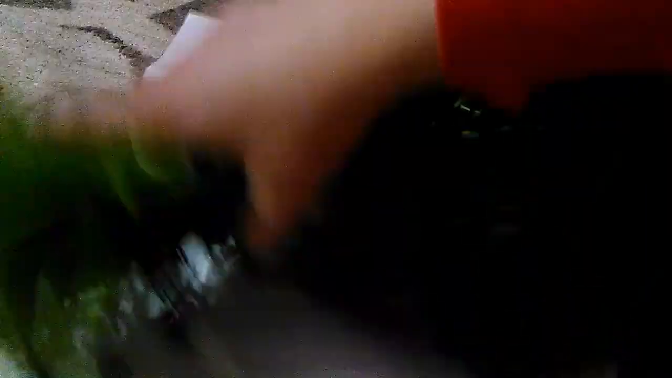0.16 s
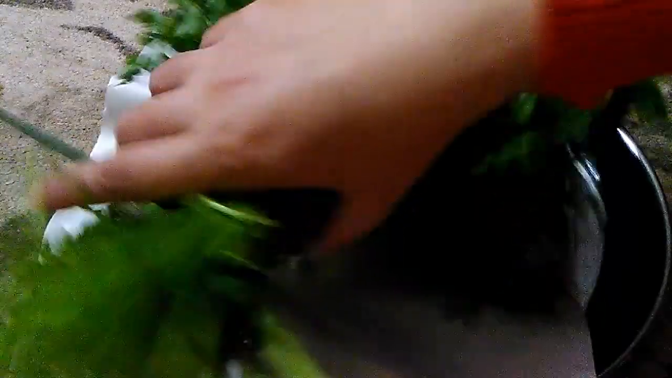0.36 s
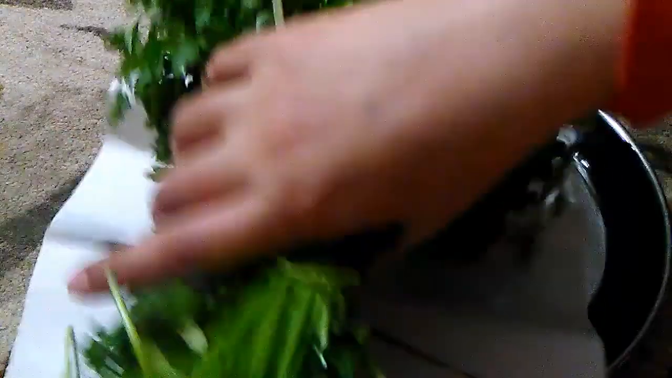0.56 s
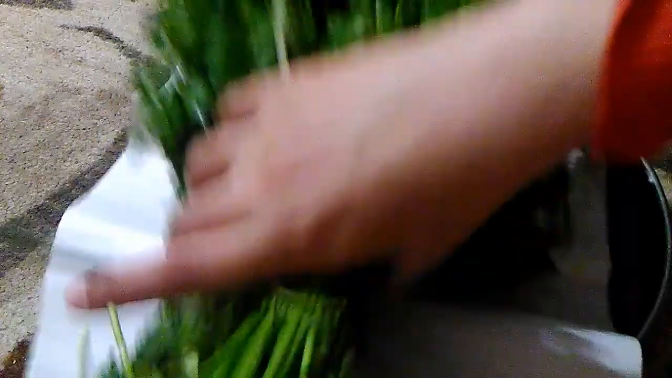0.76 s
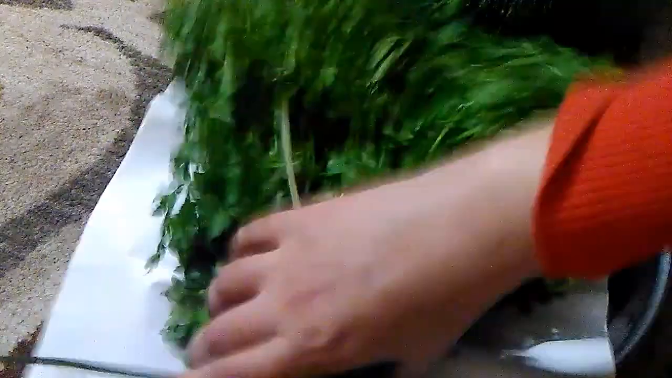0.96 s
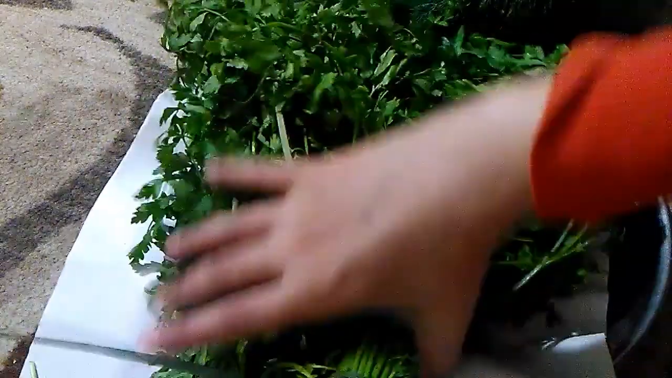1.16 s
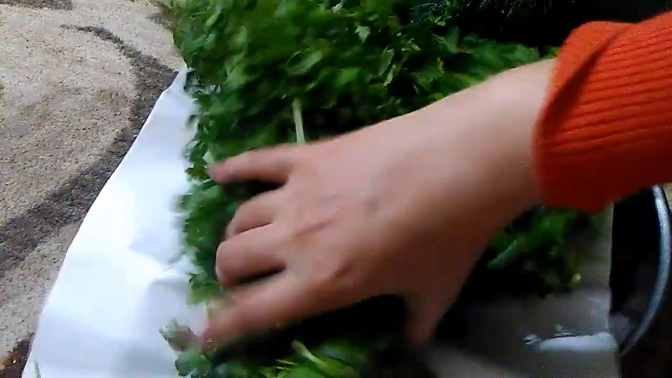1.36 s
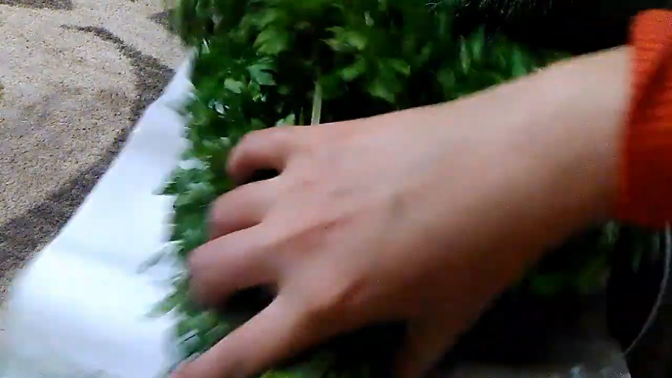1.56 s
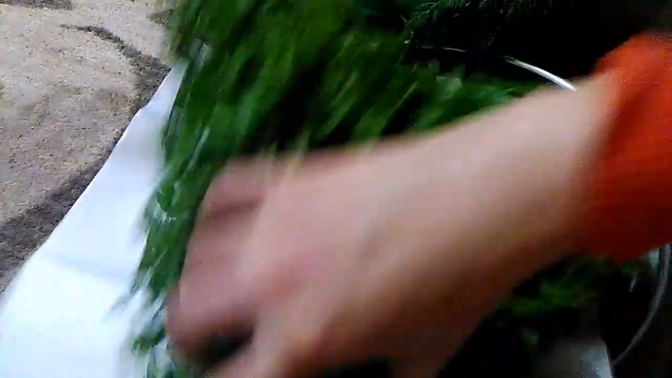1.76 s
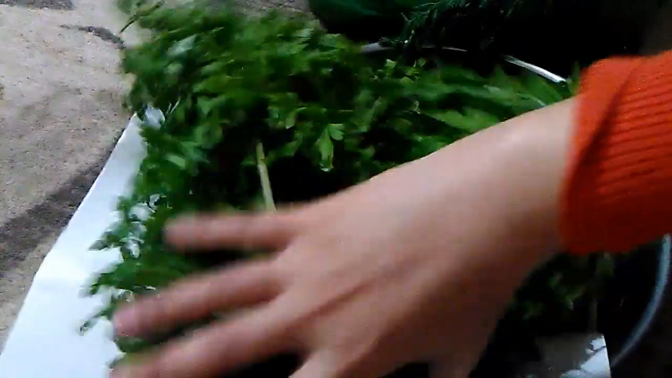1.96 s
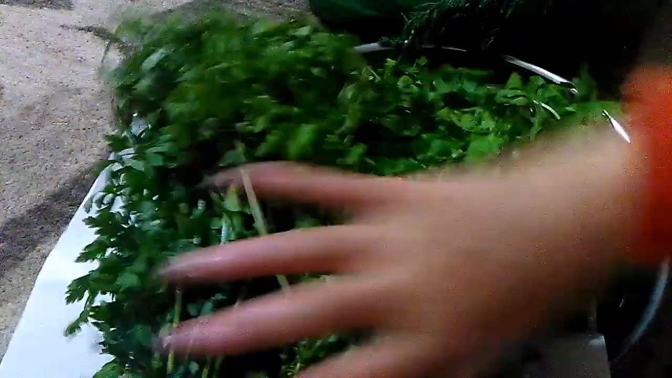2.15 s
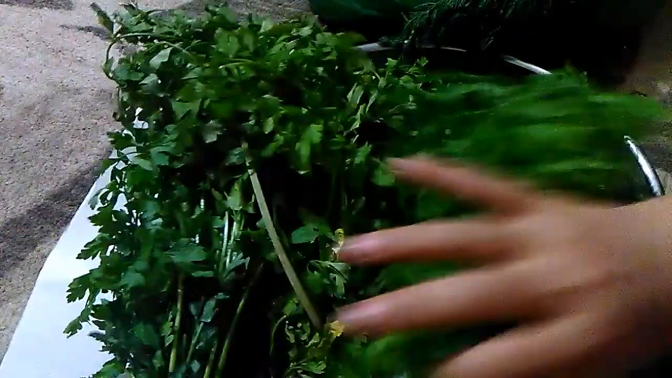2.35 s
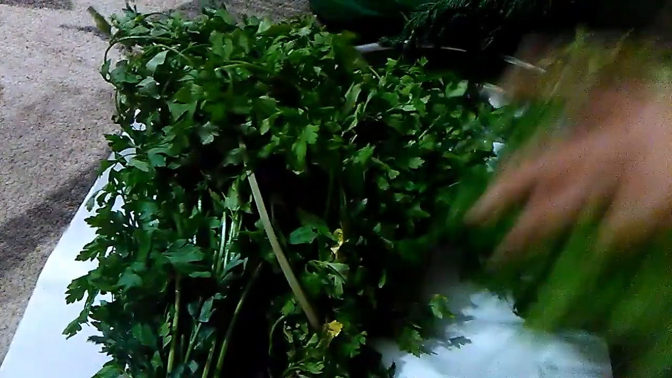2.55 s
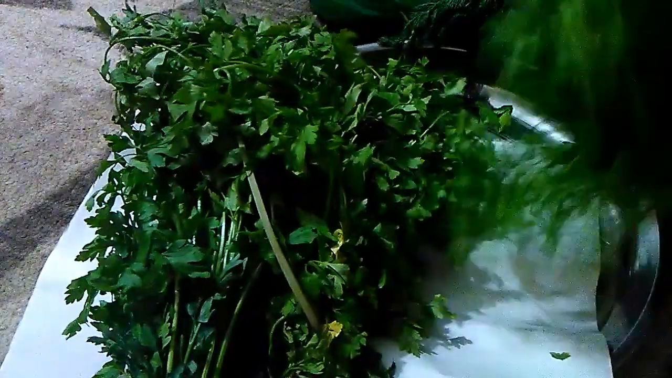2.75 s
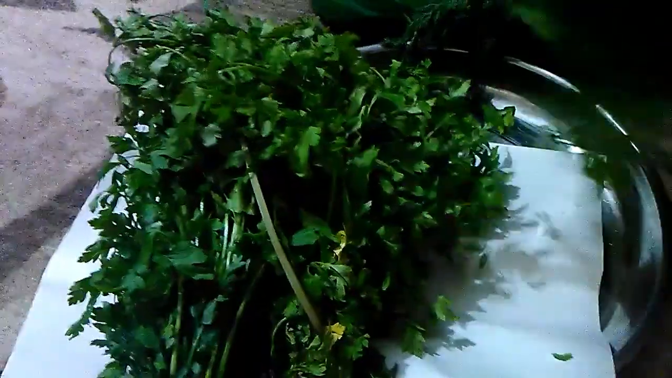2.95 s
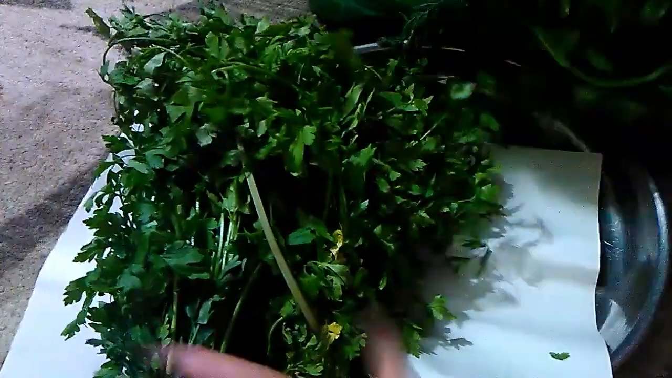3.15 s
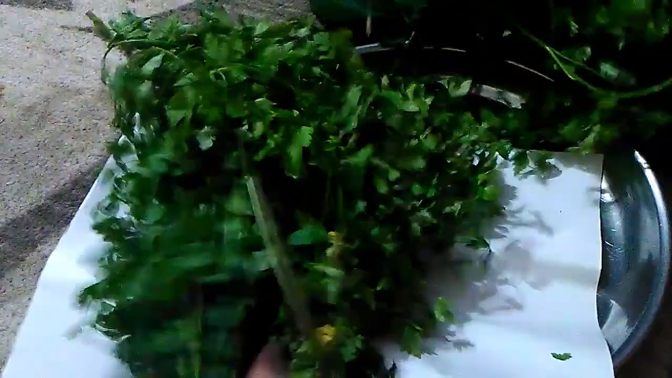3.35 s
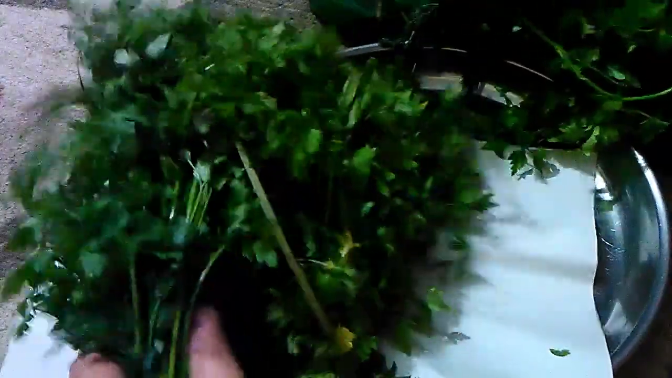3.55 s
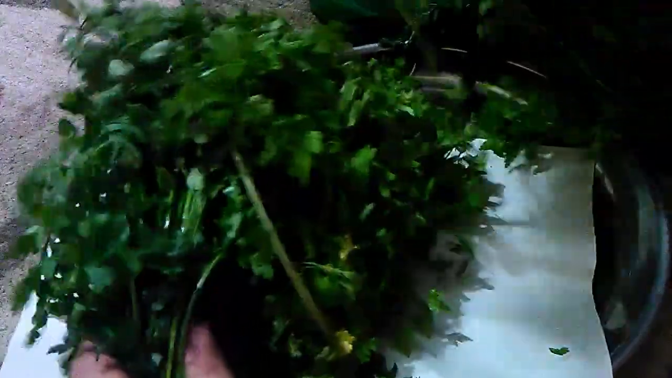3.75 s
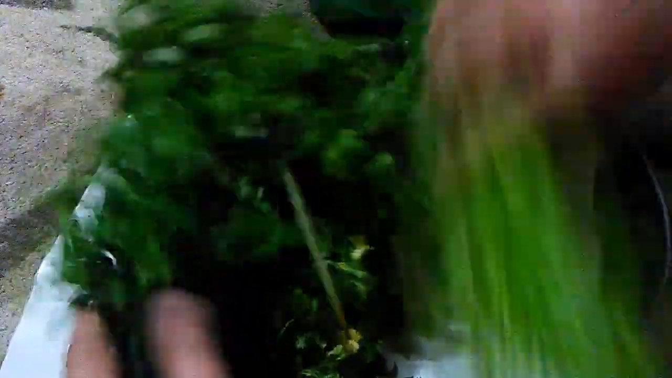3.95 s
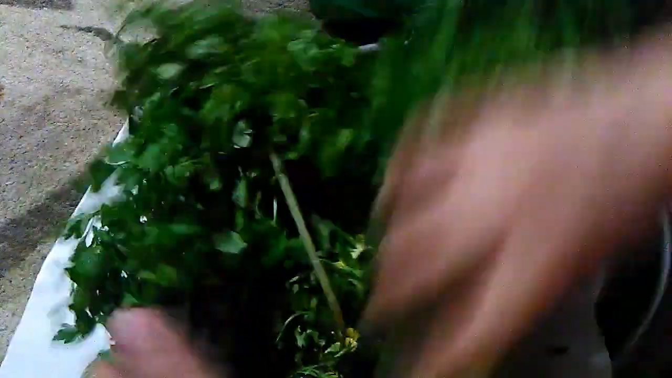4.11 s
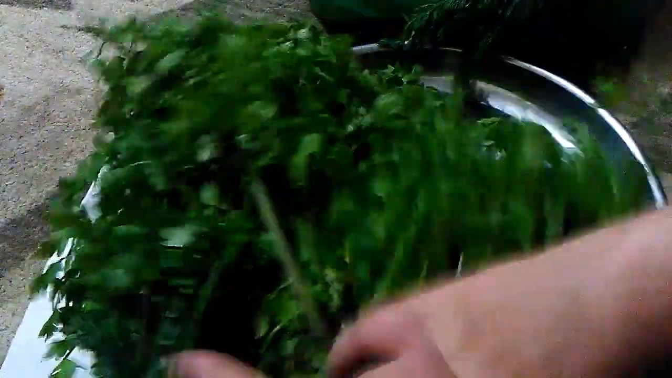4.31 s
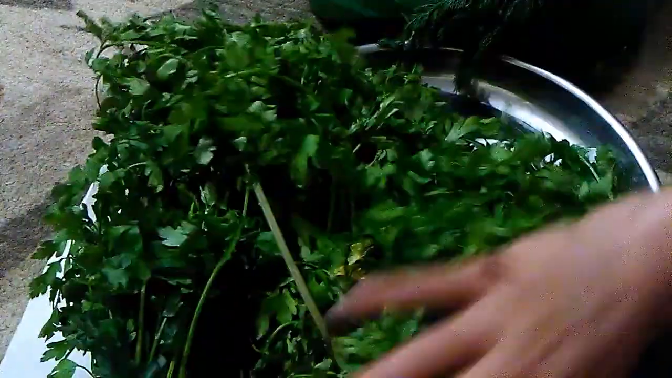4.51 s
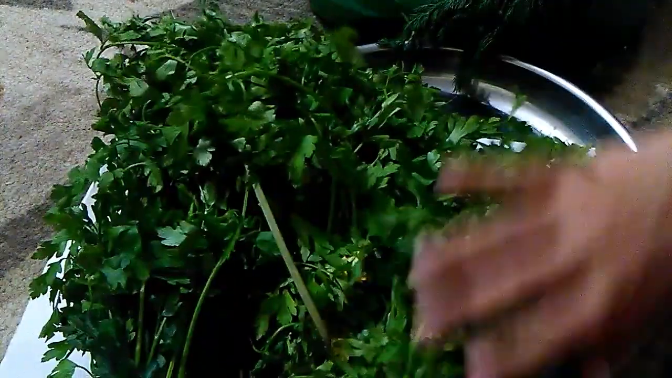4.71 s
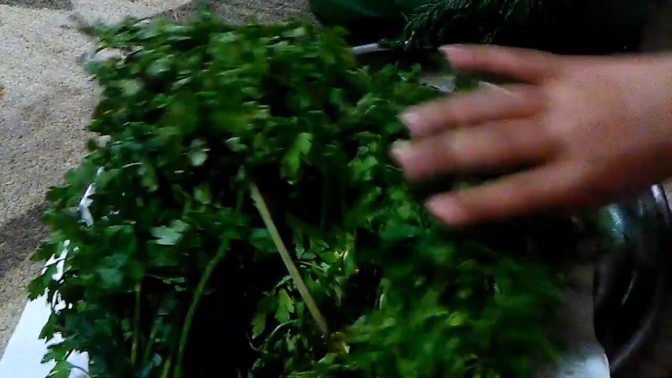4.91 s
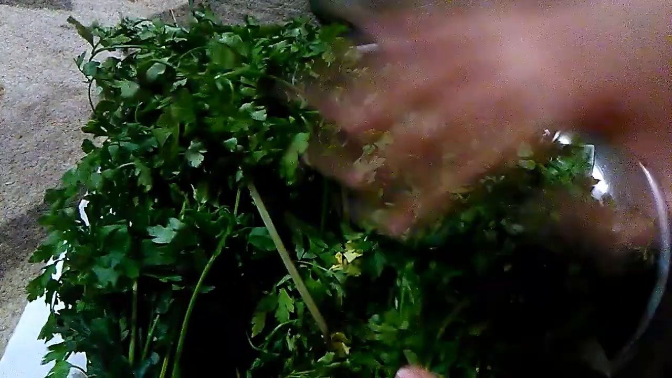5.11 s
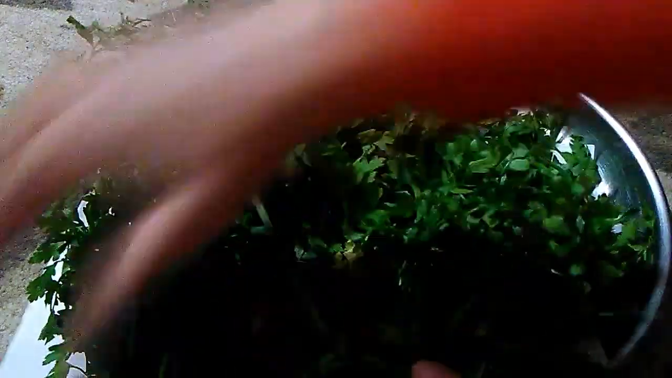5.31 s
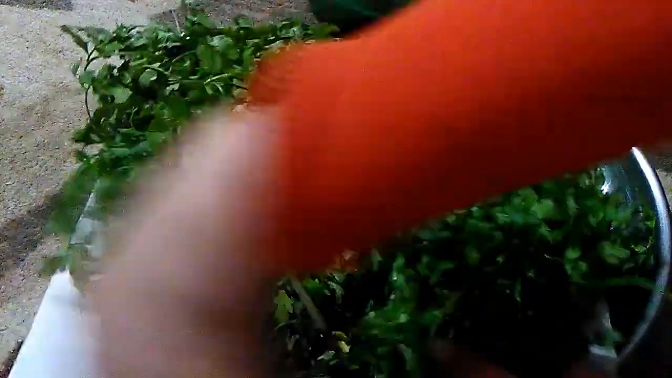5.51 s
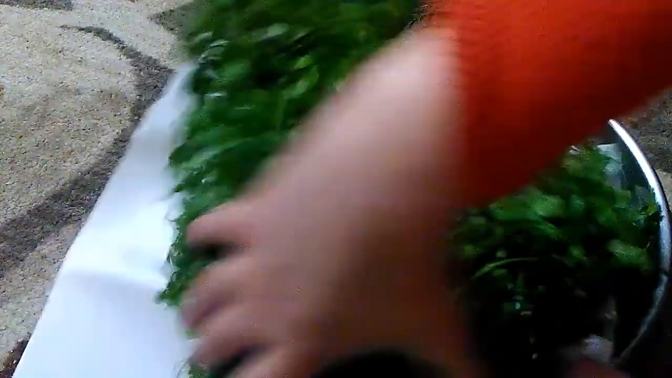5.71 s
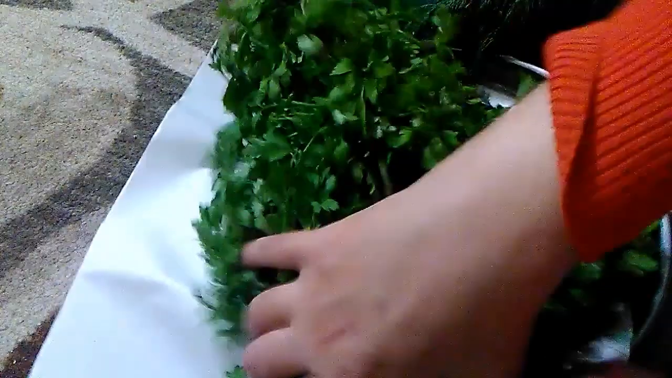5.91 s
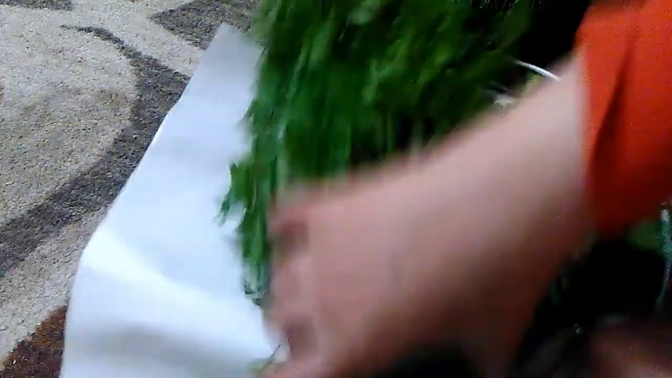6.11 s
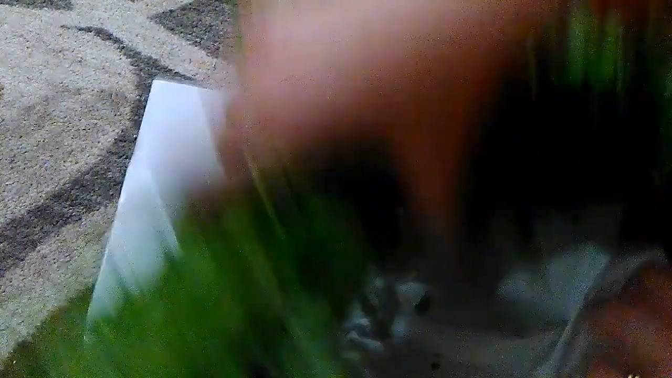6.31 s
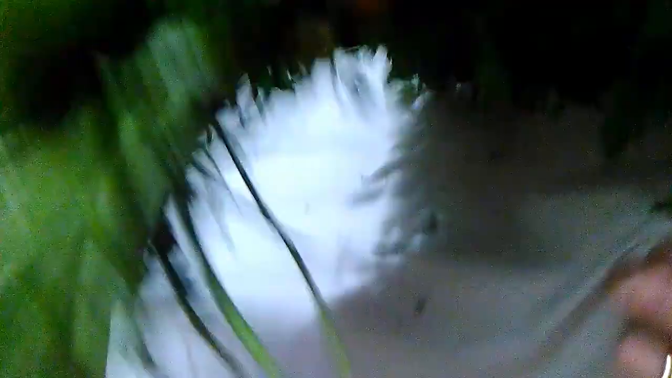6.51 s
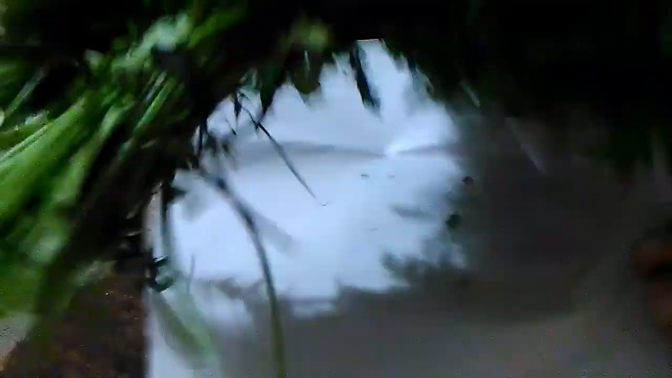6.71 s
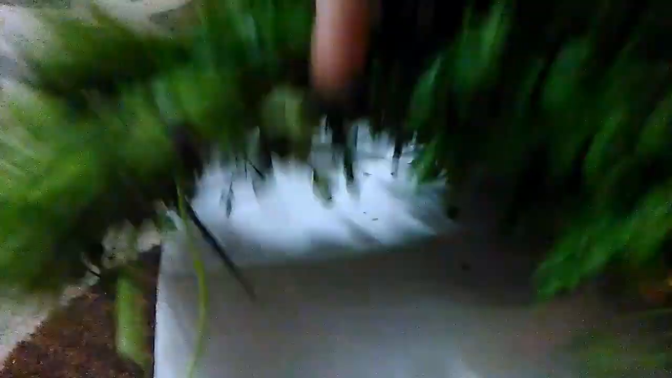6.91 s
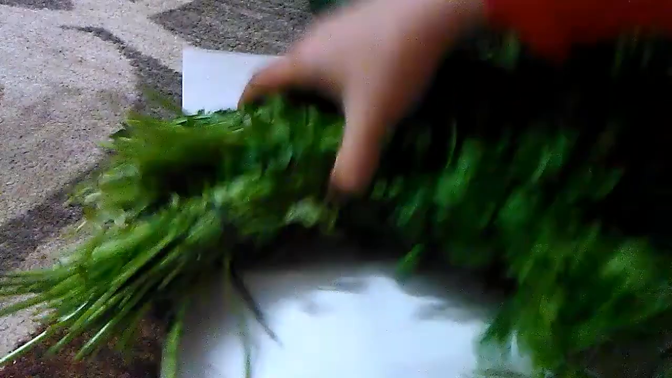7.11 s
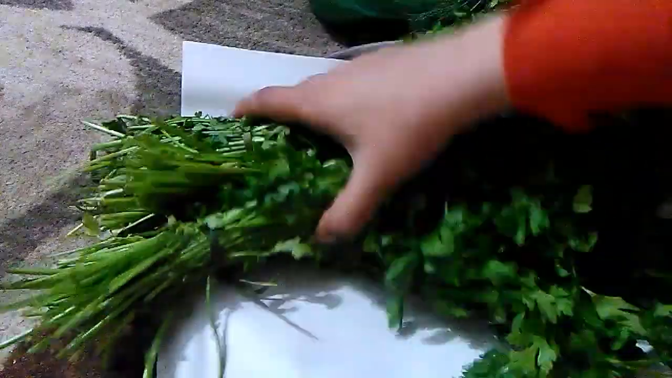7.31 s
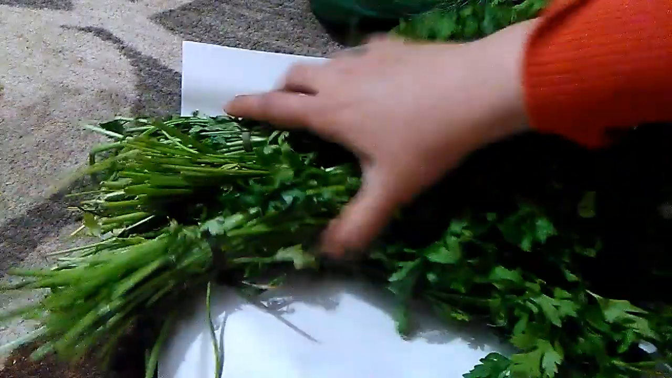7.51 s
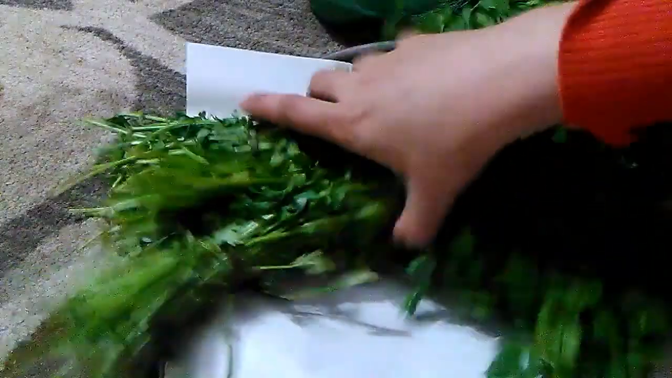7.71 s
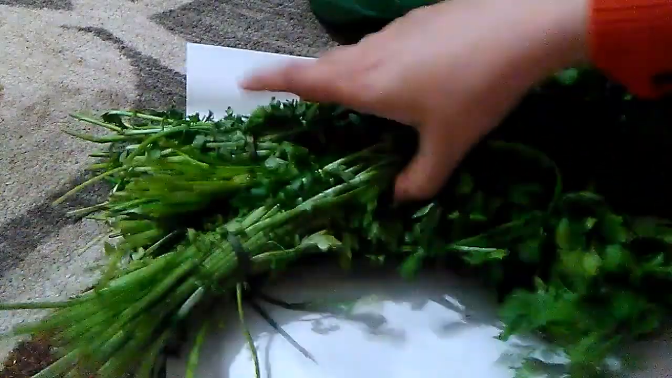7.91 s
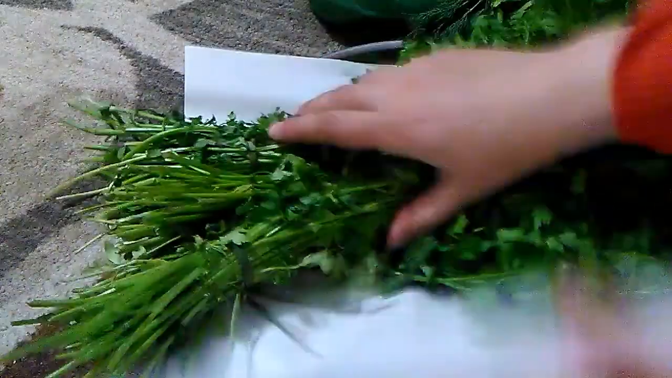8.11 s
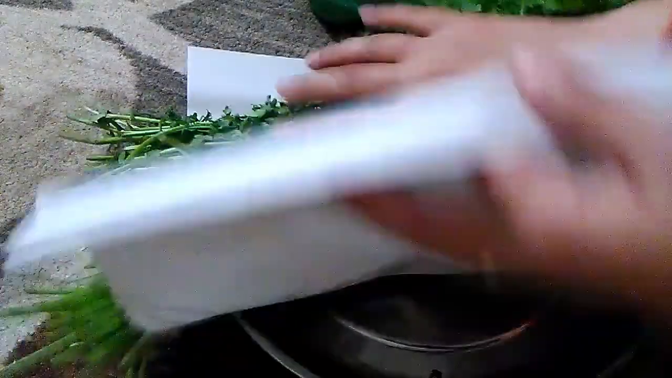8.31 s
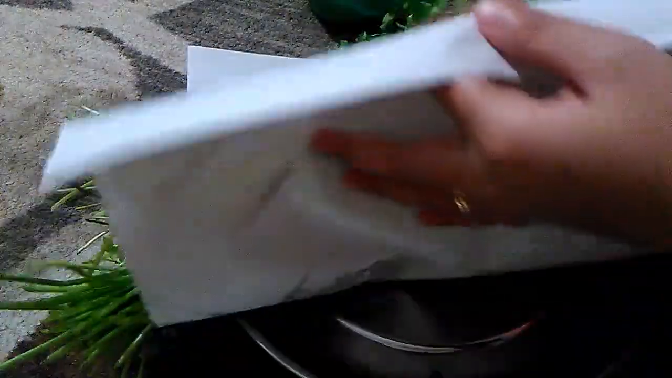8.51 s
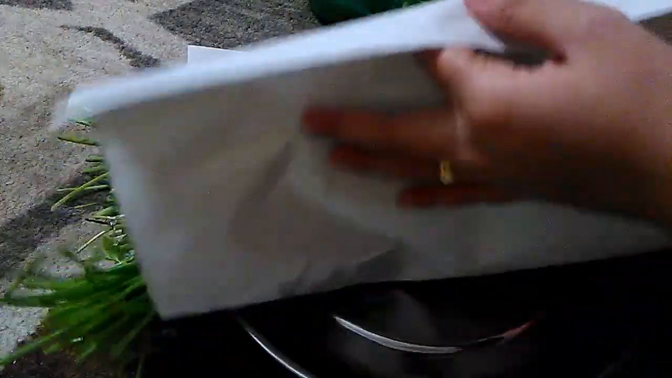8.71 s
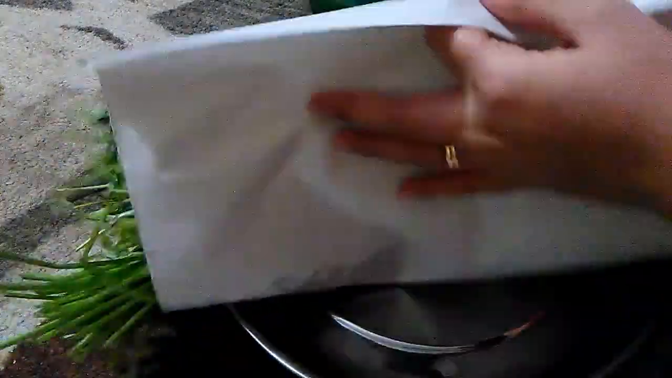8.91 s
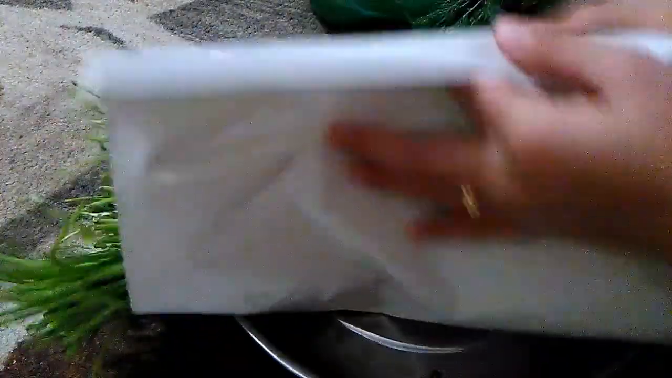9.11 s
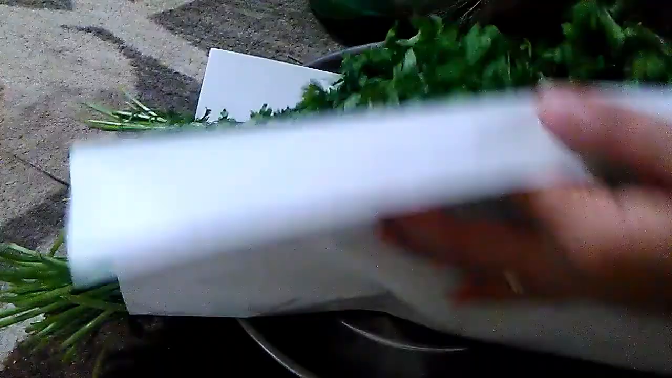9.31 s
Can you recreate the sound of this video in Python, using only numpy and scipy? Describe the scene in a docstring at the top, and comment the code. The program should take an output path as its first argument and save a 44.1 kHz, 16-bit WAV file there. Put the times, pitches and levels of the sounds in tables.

```python
"""A carpeted room, close up: bunches of fresh herbs are laid on greaseproof paper, pressed down and wrapped.
Dense showers of tiny jolts, swelling and fading with the handling, make the hiss of leaves and the crinkle
of the sheet. Creases snap as short pushes with a dense ring; pats are decaying sines, billows and slides are
shaped noise and jolts. Short noise tails give the brief room answer, over faint air noise and a mains hum."""
import sys
import numpy as np
from scipy import signal
from scipy.fft import rfft, irfft, next_fast_len
from scipy.io import wavfile
from scipy.ndimage import uniform_filter1d, map_coordinates

SR = 44100
rng = np.random.default_rng(int(sys.argv[2]) if len(sys.argv) > 2 else 0)


def waveform_to_disk(signal):
    """Save audio, clipped to [-1, 1], as 16-bit WAV at the path in sys.argv[1]."""
    frames = np.transpose(np.atleast_2d(signal))
    scaled = np.clip(frames, -1, 1) * 32767
    samples = np.round(scaled).astype(np.int16)
    wavfile.write(sys.argv[1], SR, samples)


N = 412776  # length in samples


def amp(db):
    """Decibels to gain."""
    return 10 ** (np.asarray(db) / 20)


def unit(x):
    """Scale to rms 1."""
    return x / np.sqrt(np.mean(x ** 2) + 1e-20)


def along(points, hz):
    """Read (f/Hz, value) points on a log frequency axis."""
    f, v = np.transpose(points)
    return np.interp(np.log(hz + 1), np.log(f), v)


def wobble(rate):
    """A smooth random curve, rate knots a second."""
    knots = rng.standard_normal(int(N * rate / SR) + 4)
    return map_coordinates(knots, [np.arange(N) * rate / SR])


def colour(x, *spectra, size=2048):
    """Minimum-phase filter whose gain is the sum of the (f/Hz, level/dB) spectra."""
    hz = np.fft.rfftfreq(size, 1 / SR)
    gain_db = sum(along(points, hz) for points in spectra)
    # folding the cepstrum forward in time makes the filter causal
    cepstrum = irfft(np.log(amp(gain_db)))
    cepstrum[1:size // 2] *= 2
    cepstrum[size // 2 + 1:] = 0
    response = irfft(np.exp(rfft(cepstrum)))
    return signal.fftconvolve(x, response)[:len(x)]


def shiver(t60, size=1024):
    """A jolt spreads through the sheet: a dense noise ring that falls 60 dB in t60 seconds."""
    ring = rng.standard_normal(size) * amp(-60 * np.arange(size) / SR / t60)
    return ring / np.linalg.norm(ring)


def crackle(rate, spread_db, t60, count=24):
    """Tiny jolts of uneven size, rate a second, at count places that each ring differently."""
    out = np.zeros(N)
    for _ in range(count):
        struck = np.flatnonzero(rng.random(N) < rate / count / SR)
        sizes = amp(spread_db * np.clip(rng.standard_normal(len(struck)), -2, 2))
        jolts = np.zeros(N)
        # a denser shower has smaller jolts, so its power stays even
        jolts[struck] = sizes / np.sqrt(rate[struck])
        out += signal.oaconvolve(jolts, shiver(t60))[:N]
    return unit(out)


def patchy(x, depth_db, drift_db):
    """Each facet of the sheet has its own colour: brief random patches in frequency and a slower drift."""
    z = signal.stft(x, nperseg=256)[2]

    def field(frames):
        across = uniform_filter1d(rng.standard_normal(z.shape), size=5, axis=0)
        return unit(uniform_filter1d(across, size=frames, axis=1))

    tint_db = depth_db * field(6) + drift_db * field(60)
    return unit(signal.istft(z * amp(tint_db), nperseg=256)[1][:N])


def back_face(x, delay_s=0.001278, drift=0.076, strength=0.16):
    """The sheet's far side radiates in opposite phase and arrives later, along a path that shifts."""
    lag = delay_s * SR * np.exp(drift * wobble(3))
    return unit(x - strength * map_coordinates(x, [np.arange(N) - lag]))


def gesture(start, end, attack, release, t):
    """One movement of leaves or sheet as a gain, held from start to end; attack and release each span 20 dB."""
    before = np.maximum(start - t, 0) / attack
    after = np.maximum(t - end, 0) / release
    return amp(-20 * (before + after))


# a bunch of leaves is dragged over the sheet:
# start t/s, end t/s, release t/s, rustle level/dB, flexing re rustle level/dB, crisp edge re rustle level/dB
LEAF_DRAGS = [(0.0, 0.27, 0.13, -42.5, -16.5, -3.5), (0.33, 0.626, 0.31, -46, -27.5, 1.0),
              (0.991, 1.141, 0.17, -41.5, -8.5, -3), (1.375, 1.694, 0.12, -46.5, -27, -2),
              (1.934, 2, 0.28, -49, -10.5, -6.0), (2.293, 2.366, 0.16, -53.5, -9.5, 1.5),
              (2.6, 2.848, 0.2, -68.5, -2.5, 2), (3.419, 3.574, 0.26, -43.5, -18.5, -4),
              (3.885, 4.245, 0.22, -53.5, -21, -4.0), (4.23, 4.48, 0.17, -47.5, -13.5, -5),
              (4.586, 4.729, 0.073, -52, -5.5, -5.0), (4.885, 5.06, 0.2, -44.5, -7.5, -0.5),
              (5.153, 5.58, 0.15, -52, -31, -9.5), (5.608, 6.33, 0.17, -43.5, -11, -1.5),
              (6.393, 6.853, 0.16, -39.5, -10, -8.5), (6.929, 7.176, 0.41, -41, -24, -3.5),
              (7.661, 7.9, 0.22, -46, -16, -3), (7.922, 8.36, 0.14, -43, -3.5, -3.5),
              (8.45, 8.62, 0.19, -54, -6.5, -3.5), (8.77, 8.97, 0.18, -64.5, -8, 0),
              (9.001, 9.148, 0.11, -46.5, -9.0, -1.5)]
# short swells of crumpling: a hand bears down and lets go, or the sheet settles after a snap
# (rustle level before a common swell trim):
# peak t/s, attack t/s, release t/s, rustle level/dB, flexing re rustle level/dB, crisp edge re rustle level/dB
CRUMPLE_SWELLS = [(0.01, 0.11, 0.097, -40.5, 2.5, -4.5), (0.23, 0.29, 0.15, -43, -20.5, -1.5),
                  (0.64, 0.15, 0.24, -43, -6.5, -15), (0.98, 0.13, 0.09, -21.0, -9, -3.5),
                  (1.35, 0.07, 0.067, -38.5, -15, -5), (1.551, 0.12, 0.08, -26.5, -12, -9),
                  (1.82, 0.1, 0.07, -25.5, -12, -6.0), (2.535, 0.01, 0.098, -47, -14.5, -19.0),
                  (2.889, 0.12, 0.1, -40.5, -7.5, -0.5), (3.619, 0.017, 0.062, -34.5, -11, -7.5),
                  (4.019, 0.081, 0.089, -39, -13.5, -3), (4.645, 0.01, 0.052, -49, -9, -2),
                  (5.38, 0.06, 0.18, -49.5, -4, -20), (5.475, 0.01, 0.13, -36.5, -6.5, -11.0),
                  (5.881, 0.041, 0.12, -36, -6, -3), (6.05, 0.06, 0.15, -37.5, -6.5, -11),
                  (6.148, 0.044, 0.25, -32, -9, -4), (6.409, 0.07, 0.09, -30.5, -9, -5.5),
                  (6.653, 0.01, 0.13, -29, -9, -11), (6.76, 0.06, 0.1, -41.5, -1.5, -4),
                  (7.06, 0.083, 0.2, -27, -10.5, -6.5), (7.232, 0.04, 0.11, -22.5, -14, -4.5),
                  (7.922, 0.012, 0.25, -30.5, -11, -6.0), (8.11, 0.12, 0.16, -24.0, -9.5, -7),
                  (8.31, 0.06, 0.12, -40.0, -8, -6.0), (8.5, 0.06, 0.12, -44.5, -12, -3),
                  (9.09, 0.076, 0.09, -31, -5.5, -5.5), (9.228, 0.036, 0.13, -38.5, -9.5, -6.5)]


def handling(step=64, drag_attack_s=0.083, swell_trim_db=-1.5):
    """Drags and crumpling swells add up in power: the gains of rustle, flexing sheet and crisp edge."""
    t = np.arange(0, N, step) / SR
    moves = []
    for start, end, release, *levels in LEAF_DRAGS:
        moves.append((gesture(start, end, drag_attack_s, release, t), *levels))
    for s, attack, release, *levels in CRUMPLE_SWELLS:
        moves.append((amp(swell_trim_db) * gesture(s, s, attack, release, t), *levels))
    power = 0
    for shape, db, flex_db, edge_db in moves:
        power = power + np.outer(amp([db, db + flex_db, db + edge_db]), shape) ** 2
    return [np.interp(np.arange(N) / SR, t, np.sqrt(layer)) for layer in power]


# filter of the wide sheet flexing on its tray: f/Hz, relative level/dB
FLEX_COLOUR = [(25, -20), (120, -23.5), (200, -14.5), (300, -8), (410, 2.5), (610, 3.5), (700, -5),
               (900, 0.5), (3000, -82)]
# filter of the creases and leaves: f/Hz, relative level/dB
CRINKLE_COLOUR = [(100, -27.5), (400, -34), (690, -11.5), (880, 1), (1150, 1), (1500, 2), (1950, 3),
                  (2450, -2.5), (2700, 0.5), (3300, -11.5), (4200, -11.5), (6000, -41)]
# filter of the crisp top edge of the rustle: f/Hz, relative level/dB
EDGE_COLOUR = [(1500, -60.5), (2700, -8.5), (3600, 3), (4900, 5.5), (5700, -1.5), (6350, -15), (7000, -18),
               (8700, -16.5), (10500, -24), (12700, -22.5), (15800, -30.5)]


def rustle(catch_db=0.5, stems_db=-9.5, full_effort_db=-21):
    """Leaves slide, stems tick and the sheet crinkles; louder rustle has more jolts, flexing coarser ones."""
    rustle_gain, flex_gain, edge_gain = handling()
    effort = np.minimum(rustle_gain / amp(full_effort_db), 1)
    creases = crackle(100 + 380 * effort, spread_db=3.5, t60=0.027)
    leaves = crackle(1800 + 2500 * effort, spread_db=0.5, t60=0.0055)
    stems = crackle(np.full(N, 30.), spread_db=2.2, t60=0.012, count=12)
    # share of creases against leaves
    flex_db = 20 * np.log10(flex_gain / rustle_gain)
    papery = np.clip(0.37 + 0.023 * flex_db + .5 * np.sqrt(effort), .05, .9)
    # the leaves catch and slip, so no movement is even
    uneven = amp(catch_db * wobble(16) + 0.58 * wobble(45))
    jolts = np.sqrt(papery) * creases + np.sqrt(1 - papery) * leaves + amp(stems_db) * stems
    grain = back_face(patchy(jolts * uneven, depth_db=1.8, drift_db=0.88))
    flex = flex_gain * unit(colour(grain, FLEX_COLOUR) * amp(1.3 * wobble(25)))
    crinkle = amp(0.3) * rustle_gain * unit(colour(grain, CRINKLE_COLOUR))
    edge = amp(0.7) * edge_gain * unit(colour(grain, EDGE_COLOUR))
    return flex + crinkle + edge


# filter of the still air: f/Hz, relative level/dB
AIR_COLOUR = [(25, -26), (50, -17.5), (80, -16.5), (130, -10.5), (280, -8.5), (400, -10), (700, -9.5),
              (4750, -23), (7000, -26.5), (15500, -42)]
# mains hum partials: f/Hz, rms level/dB
HUM_PARTIALS = [(50, -83.5), (151, -78), (252, -75), (351, -78.5), (452, -78.5)]


def still_room(air_db=-68.5):
    """Faint air noise, and mains hum as a sum of steady sines."""
    t = np.arange(N) / SR
    hum = np.zeros(N)
    for hz, db in HUM_PARTIALS:
        hum += amp(db) * np.sqrt(2) * np.sin(2 * np.pi * (hz * t + rng.random()))
    return hum + amp(air_db) * unit(colour(rng.standard_normal(N), AIR_COLOUR))


# room decay: f/Hz, time to fall 60 dB t/s
ROOM_DECAY = [(200, 0.52), (1500, 0.15), (5000, 0.22), (14000, 0.17)]


def room(x, count=3, predelay_s=.007):
    """A short noise tail whose decay varies with pitch; count tails take turns every quarter second."""
    out = np.zeros(N)
    turn = np.arange(N) // (SR // 4) % count
    for k in range(count):
        hz, t, z = signal.stft(rng.standard_normal(SR // 2), SR, nperseg=256)
        decay = amp(-60 * t / along(ROOM_DECAY, hz)[:, None])
        tail = signal.istft(z * decay, SR, nperseg=256)[1]
        tail = np.pad(tail / np.linalg.norm(tail), (int(predelay_s * SR), 0))
        out += signal.oaconvolve(x * (turn == k), tail)[:N]
    return out


# filter shared by all snaps: f/Hz, relative level/dB
SNAP_COLOUR = [(30, -26.5), (220, -25.5), (480, -6), (700, -7), (1000, 1.5), (1450, -2.5), (1950, -0.5),
               (3000, -3.5), (5000, -2.5), (6100, -12.5), (7000, -24.5), (8700, -21.5), (10500, -28),
               (15800, -29.5)]
# creases that buckle: t/s, level/dB, facet f/Hz, extra body level/dB,
# lead-in crunch re snap level/dB (before a common crunch trim)
CREASE_SNAPS = [(.035, -25, 1130, 4, -8), (.1312, -29.5, 4060, 6, -30), (0.2034, -30, 1730, -9, -10),
                (0.5367, -30, 1330, -3, -0.5), (0.8452, -31.5, 1490, 1.5, -4.5),
                (0.9012, -18.5, 2690, -1, -2), (.934, -20, 2100, -3, -26), (.9473, -16, 3370, 6.5, -3),
                (.9741, -17.5, 4270, 12, -2), (0.9953, -16.5, 4470, 0, 2), (1.004, -17, 3000, -3, 0),
                (1.0414, -18, 4400, 11, -30), (1.1041, -31.5, 2900, -5, -24.5), (1.1272, -31, 3260, 1, -8),
                (1.1392, -26.5, 2060, 0.5, -6), (1.355, -31, 2230, -3, -20), (1.4874, -27.5, 1610, 8, -27),
                (1.513, -26, 2500, -30, -18), (1.5506, -23, 2100, -12, -7.5),
                (1.7445, -22.5, 2480, -10, -23), (1.7985, -29.5, 1820, -11, 8),
                (1.82, -23, 2230, -10.5, -9), (1.859, -31.5, 3200, 9, -11), (1.965, -39, 2100, 1, -9),
                (1.9809, -36, 1760, -5, -3), (2.067, -40, 1980, 12.5, -30), (2.4536, -45.5, 2650, 3, -30),
                (2.5252, -35, 1600, 6, -19), (2.5952, -50, 1400, -2, -4), (2.8311, -29, 1700, -18, -6),
                (2.9053, -31, 3400, 11, -25.5), (2.9185, -33, 3830, -2, 1.5), (2.965, -43.5, 3400, 4, -6),
                (3.6153, -22.5, 2400, 6, -28), (4.2316, -22.5, 4820, -1, -37),
                (4.4647, -26.5, 2030, 1, -4.5), (4.6292, -35, 1730, 8, -30),
                (4.6364, -22.5, 1620, -0.5, -20), (4.9331, -26.5, 2650, 2, -13),
                (4.9658, -22, 2050, 5, -35), (5.157, -35.5, 2100, -6, -19), (5.1743, -30, 3130, -4, -17),
                (5.3857, -39, 1290, 3, -28), (5.4418, -31.5, 1190, 4, -11), (5.467, -15.5, 1870, -2.5, -20),
                (5.6027, -33.5, 1220, 15, -10), (5.7077, -28, 3340, 8, -18), (5.7693, -20, 2050, 2, -11),
                (5.8637, -27, 1130, 0.5, 3), (5.9743, -27.5, 3600, 6, -13), (5.99, -24.5, 1280, 6, -3),
                (6.027, -29, 3000, 0, -20), (6.0375, -16.5, 3700, 7, -33), (6.1314, -30, 1700, -1, -13),
                (6.228, -25, 1770, -16, -28), (6.2917, -31.5, 2190, 13, -4), (6.3907, -26, 2380, -1, -10),
                (6.4733, -30.5, 1000, 17, -30), (6.52, -28, 1400, 7, -3), (6.569, -22.5, 2750, 11, -25),
                (6.597, -27, 1200, 2, -32), (6.6467, -12, 1600, 0, -28), (6.8419, -24.5, 2850, 7, -30),
                (6.9304, -39, 3200, -2, -8), (7.063, -29, 1910, -0.5, 1), (7.0876, -21, 2830, 0, -26),
                (7.0987, -29, 1300, -6, -10.5), (7.2027, -20.5, 5200, 3, -29),
                (7.2303, -18, 4460, -1, -0.5), (7.237, -17.5, 1140, 1.5, -11), (7.3173, -24, 2360, 1.5, -2),
                (7.6056, -38.5, 1930, -3.5, -4), (7.689, -28, 1600, 0, -15), (7.782, -33.5, 3000, 0, -8),
                (7.907, -13.5, 3830, 7, -15), (7.918, -20.5, 1920, -6, 4), (7.95, -15, 1840, 0, -20.5),
                (8.092, -14, 2500, -1, -3.5), (8.1293, -20, 2500, -10, -30),
                (8.1532, -21.5, 2940, 14.5, -26), (8.2304, -28.5, 4070, 3, 1),
                (8.3031, -21, 3750, -14, -24), (8.3443, -23.5, 2560, -3, -30),
                (8.5034, -33.5, 2960, 6, -12), (8.6155, -45, 1100, 15, -5), (9.0661, -23, 2730, -3, -29),
                (9.1198, -29, 2400, -3, -4), (9.2137, -34, 2880, -12, -23), (9.2411, -27.5, 4020, 6, -18)]


def snaps(facet_db=5.5, ring_db=4.5, t60=0.024, lead_s=.0055, crunch_trim_db=-2.5, size=2048):
    """A crease crunches, pops through on the pitch of its facet, and the sheet around it shivers."""
    edge_db_per_octave, neutral_facet_hz = 6, 2500  # smaller facets snap more crisply
    edge_db_per_db, neutral_snap_db = 0.1, -24.5  # so do harder snaps
    out = np.zeros(N + size)
    lead = int(lead_s * SR)
    for s, db, hz, body_db, lead_db in CREASE_SNAPS:
        start = int(s * SR)
        # the buckle is one brief push, shorter for a smaller facet
        push = np.hanning(int(SR / hz / np.pi) + 2)
        pop = amp(ring_db) * shiver(t60, size=size)
        pop[:len(push)] = push / push.sum()
        edge_db = edge_db_per_octave * np.log2(hz / neutral_facet_hz)
        edge_db += edge_db_per_db * (db - neutral_snap_db)
        tint = [(500, body_db), (1100, 0.0052), (2600, 0.0038), (4300, edge_db)]
        facet = [(hz / np.sqrt(2), 0), (hz, facet_db), (hz * np.sqrt(2), 0)]
        snap = colour(pop, SNAP_COLOUR, tint, facet)
        # a snap carries the energy of its rms level held for 5.6 ms
        out[start:][:size] += amp(db) * snap / np.linalg.norm(snap) * np.sqrt(0.0056 * SR)
        crunch = colour(rng.standard_normal(lead), SNAP_COLOUR, tint) * np.linspace(.3, 1, lead)
        out[start - lead:][:lead] += amp(db + lead_db + crunch_trim_db) * unit(crunch)
    return out[:N]


# filter of the dull push of air from the sheet: f/Hz, relative level/dB
BILLOW_COLOUR = [(25, -5), (60, -5), (150, 2.5), (240, 6.5), (400, -11), (1000, -63)]
# the loose sheet billows: middle t/s, length t/s, level/dB (before a common trim)
SHEET_BILLOWS = [(0.903, 0.027, -50), (1, 0.054, -49), (1.84, 0.035, -62), (4.235, 0.0082, -47),
                 (5.767, .02, -63), (6.042, 0.023, -53), (7.924, 0.028, -52), (8.145, 0.041, -72),
                 (8.33, 0.27, -51.5), (9.102, 0.066, -51.5)]


def billows(trim_db=-4.5):
    """The moving sheet pushes air in short, low swells: dull noise under bell-shaped gains."""
    t = np.arange(N) / SR
    swell = np.zeros(N)
    for s, length, db in SHEET_BILLOWS:
        swell += amp(db + trim_db) * np.exp(-2 * ((t - s) / length) ** 2)
    return swell * unit(colour(rng.standard_normal(N), BILLOW_COLOUR))


# the hand pats the bunch down on the tray: t/s, level/dB (before a common trim), f/Hz
HAND_PATS = [(1.333, -38, 470), (1.489, -32, 500), (1.961, -32.5, 402), (2.312, -36.5, 492),
             (2.752, -42, 493), (4.42, -34.5, 523), (4.585, -37, 434), (5.524, -27, 492), (5.861, -21, 533),
             (5.971, -21.5, 535), (5.99, -17, 567), (6.037, -37, 545), (6.066, -28, 506.5),
             (6.374, -33, 380), (6.511, -30, 430), (8.087, -24, 467), (8.19, -26, 420), (8.369, -28.5, 440)]


def pats(t60=0.045, attack=0.0016, trim_db=-2.0):
    """A soft, hollow knock of the bunch on the tray: a decaying sine with a rounded onset."""
    out = np.zeros(N + SR)
    t = np.arange(SR // 8) / SR
    onset = 1 - np.exp(-t / attack)
    for s, db, hz in HAND_PATS:
        decay = amp(db + trim_db - 60 * t / t60)
        out[int(s * SR):][:len(t)] += decay * onset * np.sin(2 * np.pi * hz * t)
    return out[:N]


# filter of the thin hiss of a slide: f/Hz, relative level/dB
SLIDE_COLOUR = [(1000, -19), (4000, -11.5), (4500, -5.5), (5100, 1.5), (5800, -16), (6200, -29),
                (7900, -34), (8900, -18), (10000, -35), (11800, -34), (12800, -22), (13700, -39)]
# quick slides over the smooth paper: start t/s, end t/s, level/dB
PAPER_SLIDES = [(2.316, 2.443, -54.5), (4.243, 4.329, -46.5), (8.759, 8.832, -47)]


def slides(rise_s=0.0077):
    """Fine, fast slips while something glides over the paper."""
    t = np.arange(N) / SR
    stroke = np.zeros(N)
    for start, end, db in PAPER_SLIDES:
        stroke += amp(db) * np.clip(np.minimum(t - start, end - t) / rise_s, 0, 1)
    slips = crackle(np.full(N, 1500.), spread_db=-2.5, t60=0.0048, count=8)
    return stroke * unit(colour(slips, SLIDE_COLOUR))


def scene():
    """The wrapping, heard from close by in the room."""
    paper = rustle() + snaps() + billows() + pats() + slides()
    return (paper + amp(-14.5) * room(paper) + still_room())[None]


def record(dry, top=.92, order=6, band_limit_hz=16000):
    """Soft saturation rounds off the hardest peaks, then nothing is kept above the band limit."""
    rounded = dry / (1 + np.abs(dry / top) ** order) ** (1 / order)
    size = next_fast_len(N + SR // 2)
    kept = np.fft.rfftfreq(size, 1 / SR) < band_limit_hz
    return irfft(rfft(rounded, size) * kept, size)[:, :N]


dry = scene()
out = record(dry)
waveform_to_disk(out)
```